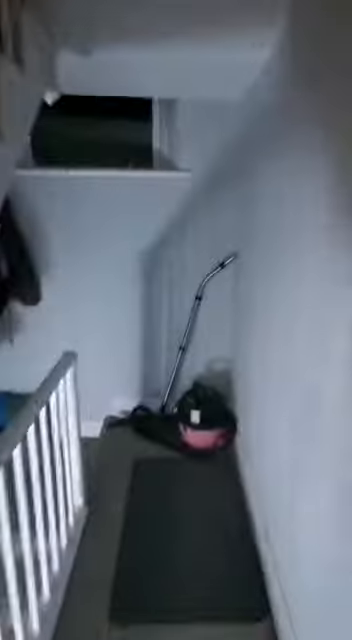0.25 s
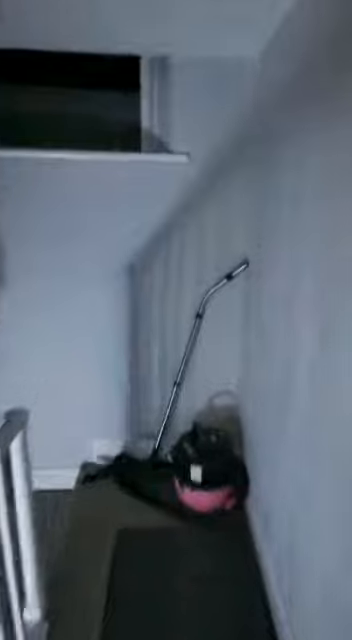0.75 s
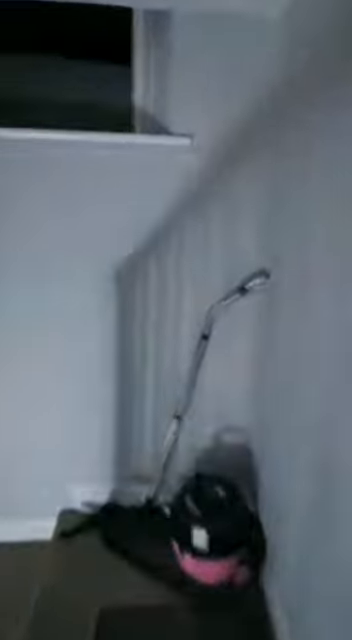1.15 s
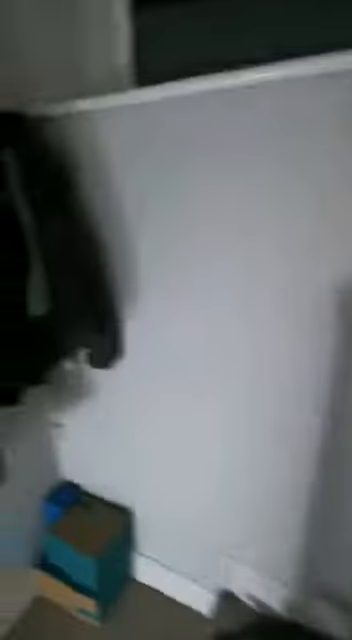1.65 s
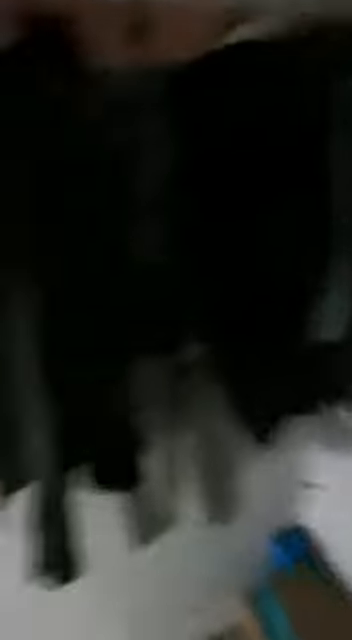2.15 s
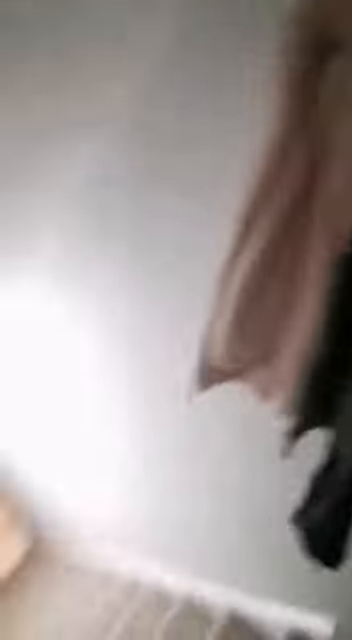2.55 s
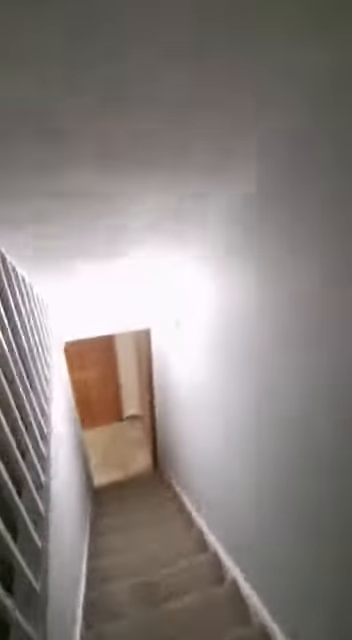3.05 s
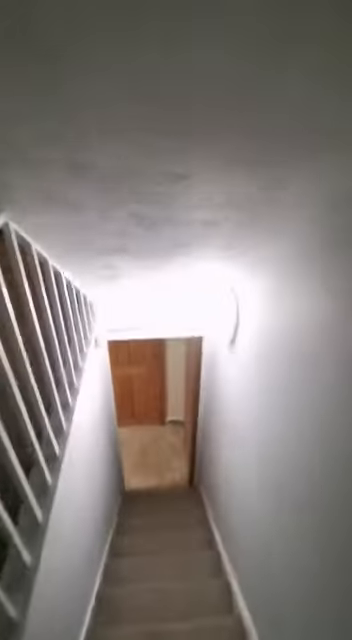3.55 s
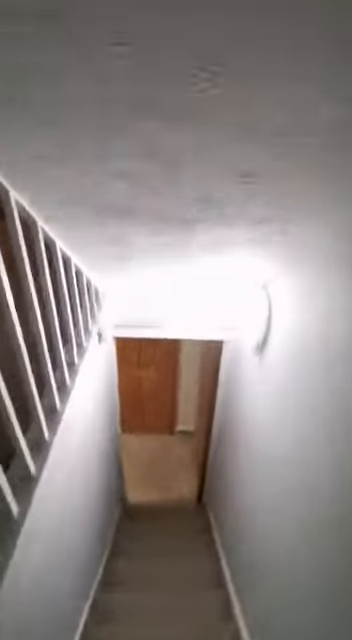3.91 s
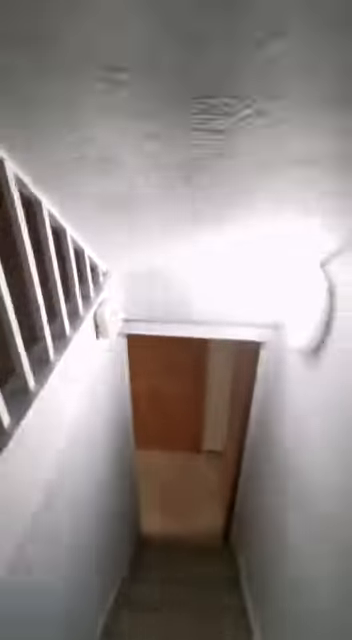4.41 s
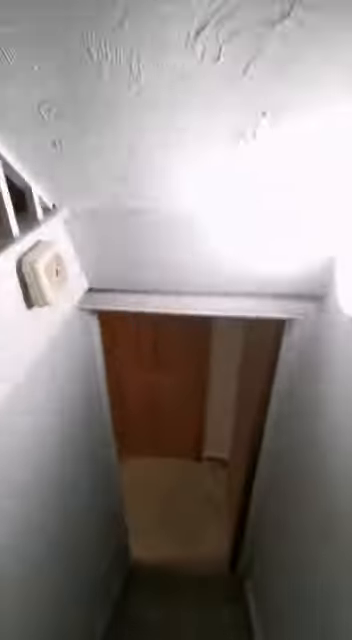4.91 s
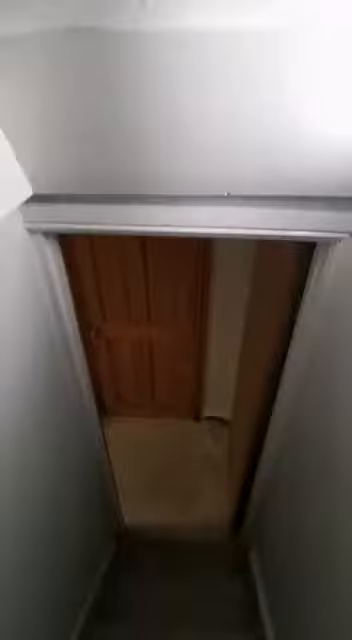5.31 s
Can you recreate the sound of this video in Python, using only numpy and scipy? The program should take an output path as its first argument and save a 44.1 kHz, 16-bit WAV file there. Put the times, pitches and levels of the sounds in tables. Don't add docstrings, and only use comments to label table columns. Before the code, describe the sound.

Faint footsteps cross a carpeted landing, then thump down wooden stairs, growing into heavy booming steps with knocks, ticks and a squeak.

```python
import sys
import numpy as np
from scipy import signal
from scipy.fft import rfft, irfft, next_fast_len
from scipy.io import wavfile

SR = 44100
rng = np.random.default_rng(int(sys.argv[2]) if len(sys.argv) > 2 else 0)


def wrap_up_sound(samples):
    columns = np.atleast_2d(samples).T
    tamed = np.clip(columns, -1, 1)
    steps = np.round(tamed * 32767).astype(np.int16)
    wavfile.write(sys.argv[1], SR, steps)


def level_to_linear(level):
    exponent = np.asarray(level, float) / 20
    return 10 ** exponent


N = 245637

# [t/s, level/dB]
BUSTLE = [(0, -71), (.26, -66), (1.1, -75), (1.4, -68.5), (1.55, -70), (1.9, -63.5), (2.2, -72.5),
          (2.9, -66), (3.3, -68), (3.55, -55.5), (3.9, -57), (4.2, -61), (4.65, -64.5), (4.92, -56.5),
          (5.08, -52.5), (5.2, -57), (5.3, -57.5), (5.57, -59)]
# [f/Hz, density/dB per Hz]
RUMBLE_SPECTRUM = [(12, -34), (20, 7), (48, 5), (81, -1), (118, 4.5), (206, -8), (300, -7), (390, -74),
                   (660, -120)]
SHUFFLE_SPECTRUM = [(110, -33), (180, 4.5), (206, 11), (490, 4.5), (897, -5.5), (1500, -25), (1950, -67),
                    (3300, -120)]
RUSTLE_SPECTRUM = [(590, -6.5), (1000, 3.5), (1110, -3.5), (1580, -3), (1640, -7.5), (2560, -4.5),
                   (4440, -13), (7110, -6), (9910, -48), (14300, -4), (15500, -38)]
HUSH_SPECTRUM = [(18, -28), (30, 15), (148, 1), (213, -9), (315, -12.5), (970, -25), (1720, -23),
                 (4780, -34), (7080, -25), (9430, -56), (10200, -39), (14300, -23), (15500, -51)]
# [f/Hz, correlation/1]
LIKENESS = [(60, 0.88), (180, 0.94), (550, 0.9), (1650, 0.62), (4970, -0.35), (15000, -0.05)]
# [t/s, level/dB]
SLEEVE = [
    (3.345, -86.5),
    (3.38, -55),
    (3.5, -49.5),
    (3.582, -55),
    (3.764, -47.5),
    (3.878, -56.5),
    (3.912, -50.5),
    (4.04, -65),
    (4.1, -90),
]
# [t/s, peak level/dB, f/Hz, T60/s, board rattle/dB]
THUDS = [(0.117, -45, 37.3, 0.73, -22), (0.201, -47, 110, 0.34, 4), (0.383, -55, 140, 0.33, 3),
         (0.689, -39.5, 40, 0.39, -13.5), (1.301, -24, 46.3, 0.27, -27), (1.863, -32, 35.3, 0.18, -16),
         (1.946, -39, 45.4, .19, -21), (2.456, -33.5, 93.5, 0.34, -10.5), (2.489, -37.5, 71.8, 0.35, -9.5),
         (2.551, -35.5, 46.8, 0.47, -30), (3.108, -48, 132.4, 0.4, 4), (3.898, -41, 120, 0.24, -5.5),
         (4.213, -28.5, 119.3, 0.18, -12), (4.171, -41, 39.7, 1, -32), (4.28, -34, 100, 0.3, -4),
         (4.566, -37, 79, 0.19, -14), (4.342, -42, 100, .25, -22), (4.703, -36, 75, .25, -10),
         (4.66, -40, 140, .3, -10), (3.921, -41, 90, .2, -8), (2.592, -37, 50, .3, -20),
         (4.6, -28.5, 91.3, 0.21, -14.5), (4.659, -35, 65.5, 0.67, -24), (4.8805, -12, 75, 0.16, -16),
         (4.953, -23.5, 68.8, 0.44, -9.5), (5.204, -20, 70, 0.1, -13), (5.243, -25, 72, .08, -10),
         (5.255, -18.5, 67, .28, -20.5), (5.513, -18, 74, 0.1, -12), (5.5405, -15, 74, 0.16, -17)]
# [f/Hz, bandwidth/Hz, level/dB]
BOARD_MODES = [(140, 34.5, 1), (218.4, 21, -6), (317.3, 14.6, -5), (379, 18, -26.5), (482, 38, -16.5)]
# [t/s, peak level/dB, body f/Hz, T60/s]
KNOCKS = [(0.2, -39, 600, 0.28), (0.384, -47, 500, 0.2), (.397, -44, 1000, .25), (.41, -48, 220, .4),
          (.212, -41, 260, .2), (1.735, -54, 400, .2), (1.785, -50, 180, .2), (0.692, -46.5, 330, 0.21),
          (1.347, -47, 284, 0.076), (1.895, -47, 372, 0.076), (2.462, -42, 500, 0.2),
          (2.493, -43, 380, .15), (2.515, -44, 450, .15), (2.901, -42, 400, 0.05), (3.14, -40, 500, .06),
          (3.111, -41.5, 696, 0.16), (3.13, -37.5, 570, 0.14), (3.351, -48, 800, .08),
          (3.44, -45, 780, .08), (3.487, -40, 800, .08), (3.494, -33, 1050, 0.1), (3.59, -45, 700, .06),
          (3.702, -42, 1150, .08), (3.768, -29, 720, 0.05), (3.897, -37, 330, .1), (3.91, -33, 286, 0.1),
          (3.926, -37, 270, .15), (3.958, -40, 250, .25), (4.065, -29, 354, 0.22), (4.197, -41, 710, 0.12),
          (4.275, -37, 264, 0.12), (4.278, -37, 700, .1), (4.318, -40, 330, .15), (4.556, -45, 800, .1),
          (4.628, -40, 520, .12), (4.294, -33, 323, 0.18), (4.492, -38, 330, 0.19), (4.612, -43, 330, 0.65),
          (4.787, -43, 600, 0.065), (4.882, -37, 364, 0.16), (4.886, -33, 200, .2),
          (4.964, -30.5, 670, 0.17), (4.966, -33, 1300, .1), (5.011, -30, 1100, .12),
          (5.03, -37, 1300, .12), (4.9935, -22, 837, 0.068), (5.009, -23, 348, 0.12),
          (5.249, -27, 322, 0.093), (5.298, -23, 330, 0.14), (5.485, -28, 900, 0.1), (5.487, -30, 400, .2),
          (5.533, -31, 500, .1), (5.547, -30, 560, .15), (5.521, -25, 297, 0.48), (5.544, -21.5, 312, 0.2)]
# [t/s, peak level/dB, ring f/Hz, T60/s, left-right/dB]
TICKS = [(0.2106, -40, 3050, 0.06, 9), (0.275, -44, 2630, 0.07, 6), (.395, -56, 1700, .1, 0),
         (2.4594, -50, 2160, 0.17, -3), (2.81, -45, 5500, .08, -4), (2.875, -46, 1700, .15, -3),
         (2.8078, -41, 1920, 0.15, -2), (2.8723, -40, 5170, 0.11, -8.5), (2.9015, -46, 3000, .03, 0),
         (3.012, -43, 6850, 0.18, 0), (3.0239, -29, 6880, 0.22, -5.5), (3.1138, -39, 1450, 0.09, 2),
         (3.962, -42, 2700, 0.05, 1), (3.768, -40, 2270, .04, 2), (4.01, -52, 3950, .15, 0),
         (4.064, -41, 1400, 0.048, 0), (4.1956, -48, 2150, 0.07, 3), (4.2939, -39.5, 3370, 0.08, -8),
         (4.49, -50, 3170, 0.13, -4.0), (4.556, -37.5, 2080, 0.085, -5), (4.9222, -31, 2360, 0.12, -8),
         (4.932, -36, 1750, .1, -6), (4.9644, -27, 1700, 0.1, -7.5), (4.9951, -28, 1405, 0.17, -14.5),
         (5.2978, -21, 1900, 0.07, -2), (4.996, -35, 6500, .08, -10), (5.3015, -21, 2500, .05, -4),
         (5.303, -26, 1600, .06, -2), (5.218, -31, 3120, .07, -4), (5.248, -38, 2300, .05, -5),
         (5.54, -36, 2800, .1, -4), (5.484, -31.5, 1200, 0.13, -1), (5.5205, -27.5, 1900, 0.094, -4),
         (3.028, -30.5, 3630, 0.089, -3)]
# [f/Hz, bandwidth/Hz, level/dB]
CRACK = [(2100, 2100, 5), (3560, 380, -1.5), (6200, 1400, 3.5)]
# [t/s at the top, level/dB, length/s, colour f/Hz, left-right/dB]
SCUFFS = [(.29, -59.5, 0.099, 5900, 1), (0.596, -63, 0.043, 5500, 2), (0.667, -59, 0.047, 5000, 1),
          (0.804, -59.5, 0.054, 4530, 1), (0.87, -58.5, 0.1, 5500, 0), (0.948, -68, 0.091, 1500, -1),
          (1.828, -58.5, 0.16, 1790, -4), (1.941, -66, .1, 2300, 4), (2.55, -55.5, .12, 1890, -1),
          (2.614, -59.5, 0.054, 1940, 0), (2.909, -61, 0.037, 2880, 0), (3.13, -56.5, 0.066, 5780, -8),
          (4.298, -52.5, 0.073, 3480, -5), (4.516, -61, 0.067, 3230, -6), (4.641, -52.5, 0.1, 4170, -9.5),
          (4.968, -44, 0.04, 4000, -11), (5.232, -45, .08, 5650, -6.5), (5.326, -48.5, 0.097, 1850, 1),
          (5.275, -52, .05, 5500, -6), (2.5, -58, .05, 1300, 0), (4.645, -57, .07, 1200, -2),
          (3.48, -54, .06, 7200, -3), (3.41, -57, .05, 6000, -3), (4.32, -57, .07, 700, 0),
          (5.39, -55, 0.1, 1700, 3), (5.55, -47, 0.068, 5450, -10.5)]
# [t/s, level/dB]
RUB = [
    (1.41, -62),
    (1.45, -56.5),
    (1.475, -44.5),
    (1.487, -36.5),
]
# [t/s, palm cavity f/Hz, level/dB]
SLIDE = [
    (3.66, 1700, -70),
    (3.72, 1900, -49),
    (3.77, 2350, -49),
    (3.79, 1750, -54),
    (3.83, 1950, -48),
    (3.86, 2300, -51),
    (3.885, 2150, -55),
    (3.92, 2400, -50),
    (3.97, 2400, -80),
]
# [t/s, held/s, slip rate f/Hz, upward glide/1, level/dB]
SQUEAKS = [
    (5.196, 0.008, 702, 0.02, -25),
    (5.208, 0.025, 770, 0.012, -30.5),
    (4.943, 0.012, 2250, 0.024, -32),
    (4.919, 0.022, 790, 0.022, -45),
    (5.02, .06, 2245, .004, -55),
]
# [f/Hz, right level/dB, left-right/dB]
TREAD = [(750, 0, -1), (1450, -19, 4), (2150, -4, -11), (2900, -4, -5), (3600, -20, -2), (4150, -19, -6),
         (4480, -4, -13), (4680, -30, 0), (5550, -11, -7), (6200, -26, 2), (6800, -6, -10), (7700, -24, -8),
         (9000, -14, -8), (14000, -22, -8)]


def in_time(rows):
    times, *columns = np.transpose(rows)
    return [np.interp(np.arange(N) / SR, times, column) for column in columns]


def at_hz(points, hz):
    points = np.array(points)
    return np.interp(np.log(hz), np.log(points[:, 0]), points[:, 1])


def rms_one(x):
    return x / np.sqrt(np.mean(x ** 2) + 1e-20)


def decay(t, t60):
    return level_to_linear(-60 * t / np.maximum(t60, .005))


def drift(rate, size=1):
    knots = int(N / SR * rate) + 2
    places = np.linspace(0, knots - 1, N // size + 1)[:N]
    return np.interp(places, np.arange(knots), rng.standard_normal(knots))


def butter(x, order, hz, kind="low"):
    return signal.sosfilt(signal.butter(order, hz, kind, fs=SR, output="sos"), x)


def lowpass(x, hz):
    return butter(x, 3, hz)


def resonate(x, hz, width_hz):
    r = np.exp(-np.pi * width_hz / SR)
    numerator = [(1 - r * r) / 2, 0, (r * r - 1) / 2]
    return signal.lfilter(numerator, [1, -2 * r * np.cos(2 * np.pi * hz / SR), r * r], x)


def sides(pan_db):
    return level_to_linear(np.array([[pan_db / 2], [-pan_db / 2]]))


def add(out, s, sound):
    at = round(s * SR)
    out[..., at:at + sound.shape[-1]] += sound[..., :N - at]


def banded_noise(spectrum, patchy_db, grain_db):
    out = 0
    together = drift(30, size=16)
    edges = 20 * 2 ** np.arange(0, 9.8, .5)
    grain = level_to_linear(grain_db * rng.standard_normal(N // 16 + 1)).repeat(16)[:N]
    white = rng.standard_normal((2, 2, N)) * grain
    for k, (low, high) in enumerate(zip(edges, edges[1:])):
        if spectrum[0][0] >= high or low >= spectrum[-1][0]:
            continue
        hz = np.sqrt(low * high)
        mid, side = butter(white[k % 2], 2, [low, high], "band")
        alike = np.clip(at_hz(LIKENESS, hz), -1, 1)
        flicker_db = patchy_db * (together + 0.53 * drift(18, size=16))
        gain = level_to_linear(at_hz(spectrum, hz) + flicker_db).repeat(16)[:N]
        out = out + gain * np.array([np.sqrt(1 + alike) * mid, np.sqrt(1 - alike) * side])
    return rms_one(np.array([out[0] + out[1], out[0] - out[1]]))


def rumble(bustle_db):
    descent_s = np.maximum(np.arange(N) / SR - 3.96, 0)
    gain = level_to_linear(-60 + 0.54 * bustle_db + 7 * descent_s)
    return gain * banded_noise(RUMBLE_SPECTRUM, patchy_db=3.5, grain_db=0)


def shuffle(bustle_db):
    return level_to_linear(-66 + 0.98 * bustle_db) * banded_noise(SHUFFLE_SPECTRUM, patchy_db=2.5, grain_db=3.5)


def hush():
    return level_to_linear(-64.5) * banded_noise(HUSH_SPECTRUM, patchy_db=3.5, grain_db=-0.2)


def rustle(bustle_db):
    calm_db = -70
    gain = np.hypot(level_to_linear(calm_db + 0.74 * bustle_db), level_to_linear(in_time(SLEEVE)[0]))
    bright_db = 4 - 0.23 * (20 * np.log10(gain) - calm_db)
    cloth = banded_noise(RUSTLE_SPECTRUM, patchy_db=2.0, grain_db=1.5)
    low = butter(cloth, 2, 3600)
    high = butter(cloth, 2, 3600, "high")
    sheen = butter(cloth, 2, [6400, 8700], "band")
    return gain * sides(-1.5) * (low - level_to_linear(bright_db) * (high + level_to_linear(-1.5) * sheen))


def thuds():
    boom, shake = np.zeros(N), np.zeros(N)
    t = np.arange(SR // 2) / SR
    for s, db, hz, t60, boards_db in THUDS:
        cycles = min(1.06 * level_to_linear(0.21 * (db + 32)), 1.35)
        rise = cycles / hz
        onset = np.sin(np.pi / 2 * np.clip(t / rise, 0, 1)) ** 2
        swell = onset * decay(np.maximum(t - rise, 0), t60)
        add(boom, s, -level_to_linear(db) * swell * np.sin(2 * np.pi * hz * t))
        later = (1 - decay(t, 0.22)) * decay(t, 1.8 * t60)
        add(boom, s, level_to_linear(db - 15.5) * later * np.sin(2 * np.pi * 0.722 * hz * t))
        add(shake, s + 0.61 * rise, level_to_linear(db + boards_db) * swell)
    jolts = lowpass(shake * rng.standard_normal(N) * level_to_linear(5.85 * drift(90)), 642)
    rattle = sum(level_to_linear(db) * resonate(jolts, hz, width_hz) for hz, width_hz, db in BOARD_MODES)
    return sides(-2.6) * (boom + level_to_linear(20.5) * rattle)


def knocks():
    out = np.zeros((2, N))
    t = np.arange(SR // 4) / SR
    for s, db, hz, t60 in KNOCKS:
        spray = rng.standard_normal(len(t))
        body = resonate(spray, hz, 0.27 * hz) + 0.44 * resonate(spray, 2.07 * hz, 1.0 * hz)
        body = rms_one(lowpass(body, 5.07 * hz))
        blow = -1.4 * np.sin(2 * np.pi * hz * t) * decay(t, 7 / hz)
        sound = blow + level_to_linear(-8) * body * (1 - np.exp(-t / 0.00032)) * decay(t, t60)
        add(out, s - .001, level_to_linear(db - 4.5) * sound * sides(-1.5))
    return out


def stairwell(x):
    t60_s, wall_cut_hz = 0.23, 7200
    size = next_fast_len(N + SR)
    hz = np.arange(size // 2 + 1) * SR / size
    out = np.zeros((2, len(hz)), complex)
    for k, lag in enumerate(rng.uniform(.006, .03, 12)):
        absorption = (1 + 1j * hz / wall_cut_hz) ** 0.28
        loop = level_to_linear(-60 * lag / t60_s) * np.exp(-2j * np.pi * hz * lag) / absorption
        out[k % 2] += loop / (1 - loop) * (-1) ** (k // 2)
    return irfft(out * rfft(x, size), size)[:, :N]


def ticks():
    out = np.zeros((2, N))
    t = np.arange(SR // 4) / SR
    for s, db, hz, t60, pan_db in TICKS:
        common, *separate = rng.standard_normal((3, len(t)))
        spray = common + 2.0 * np.array(separate)
        crack = 0
        for f_hz, width_hz, level_db in CRACK:
            dull_db = 4.5 * abs(np.log2(f_hz / hz))
            crack = crack + level_to_linear(level_db - dull_db) * resonate(spray, f_hz, width_hz)
        strike = 2.2 * np.sin(2 * np.pi * hz * t) * decay(t, 70 / hz)
        ring = rms_one(resonate(spray, hz, 0.08 * hz)) + strike
        fall = (decay(t, t60) + 0.55 * decay(t, 0.011)) * (1 - np.exp(-t / .001))
        snap = (hz / 7000) ** 2.5 * spray * decay(t, .05)
        add(out, s - .0005, level_to_linear(db - 12.0) * snap * sides(pan_db))
        add(out, s - .0005, level_to_linear(db - 15.0) * (rms_one(crack) + 0.8 * ring) * fall * sides(pan_db))
    return out


def scuffs():
    out = np.zeros((2, N))
    for s, db, length, hz, pan_db in SCUFFS:
        size = min(int(1.3 * length * SR), SR // 4)
        grain = level_to_linear(3.4 * rng.standard_normal(SR // 4))
        common, *separate = rng.standard_normal((3, SR // 4)) * grain
        fibre = 0.38 * max(2500 / hz, 1) * common + np.array(separate)
        tone = rms_one(resonate(fibre, hz, 0.96 * hz)) + 0.082 * rms_one(resonate(fibre, 1800, 7200))
        add(out, s - size / SR / 2, level_to_linear(db) * tone[:, :size] * np.hanning(size) * sides(pan_db))
    return out


def tap():
    tap_s = 1.4876
    t = np.arange(N) / SR - tap_s
    after = np.clip(t - .0001, 0, .1)
    suction = -np.exp(-(np.abs(t) / 0.00011) ** 1.8)
    rebound = 1.73 * (after / 0.0003) * np.exp(-after / 0.00027)
    let_go = 0.066 * np.gradient(np.exp(-(t / .00004) ** 2))
    pulse = butter(suction + rebound + let_go, 1, 55, "high")
    leak = level_to_linear(-54) * np.gradient(pulse) * 2.3
    grains = (rng.random(N) < 6000 / SR) * rng.standard_normal(N)
    grains = grains * level_to_linear(3 * np.minimum(rng.exponential(1, N), 4))
    skin = resonate(grains, 1600, 2000) + .5 * resonate(grains, 5500, 2800)
    skin = rms_one(lowpass(skin, 7400) + 0.023 * grains)
    rub = level_to_linear(in_time(RUB)[0]) * skin * (t > RUB[0][0] - tap_s) * (t < 0)
    return level_to_linear(-4.5) * np.array([pulse, leak]) + rub * level_to_linear([[0], [-26]])


def slide():
    hz, db = in_time(SLIDE)
    band = signal.lfilter([1], [1, -np.exp(-np.pi * 320 / SR)], rng.standard_normal((2, N)))
    turn = 2 * np.pi * np.cumsum(hz) / SR
    noise = rms_one(band[0] * np.cos(turn) + band[1] * np.sin(turn))
    t = np.arange(N) / SR
    inside = (t > SLIDE[0][0]) & (t < SLIDE[-1][0])
    return sides(4.8) * inside * level_to_linear(db + 1.5 * drift(60)) * noise


def squeaks():
    grip_s, let_go_s, linger_s = 0.0062, 0.0078, 0.18
    port_lag_s = .00004
    out = np.zeros((2, N))
    shade = np.array(TREAD)[:, ::2]

    def roughness(count):
        return signal.lfilter([.03], [1, -.97], rng.standard_normal(count))

    for start, held, rate, glide, top_db in SQUEAKS:
        s = start + np.cumsum([0, grip_s, held, let_go_s, linger_s])
        per_s = rate * (1 - glide * np.array([1, .5, 0, 0, 0]))
        db = top_db + np.array([-14.5, 0, -122 * held, -30, -40 * 2250 / rate])
        t = np.arange(s[0], min(s[-1], s[0] + .24), 1 / SR)
        hz = np.interp(t, s, per_s) * (1 + .1 * roughness(len(t)))
        force_db = np.interp(t, s, db) + 9 * roughness(len(t))
        mean_hz = hz.mean()
        turn = 2 * np.pi * (np.cumsum(hz) / SR - mean_hz * np.array([[port_lag_s], [0]]))
        for k in range(1, int(14000 / mean_hz)):
            colour_db = at_hz(TREAD, k * hz) - at_hz(TREAD, mean_hz)
            colour_db += .06 * (k - 1) * (force_db - top_db)
            colour_db += 16 * roughness(len(t)) * (k > 1)
            colour_db -= 45 * (k - 1) * np.minimum(t - start, held + grip_s)
            ports = level_to_linear(np.array([at_hz(shade, k * hz), 0 * hz]))
            partial = np.cos(k * turn - k * k / 4)
            add(out, s[0], np.sqrt(2) * level_to_linear(force_db + colour_db) * partial * ports)
    return out


def scene():
    bustle_db = in_time(BUSTLE)[0] + 66
    bed = rumble(bustle_db) + shuffle(bustle_db) + hush() + rustle(bustle_db)
    blows = knocks() + ticks() + scuffs() + squeaks()
    blows += level_to_linear(-16.5) * stairwell(blows.mean(axis=0))
    blows = butter(blows, 4, 7300) + level_to_linear(-17.5) * blows
    return bed + blows + thuds() + tap() + slide()


def roll_off(x):
    return signal.sosfilt(signal.butter(12, 16490, fs=SR, output="sos"), x)


def record(dry):
    mix = butter(dry, 1, 12, "high")
    mix = signal.sosfilt(signal.cheby2(8, 30, 15500, fs=SR, output="sos"), mix)
    mix = mix * np.minimum((N - np.arange(N)) / (.004 * SR), 1)
    return roll_off(mix)


dry = scene()
out = record(dry)
wrap_up_sound(out)
```